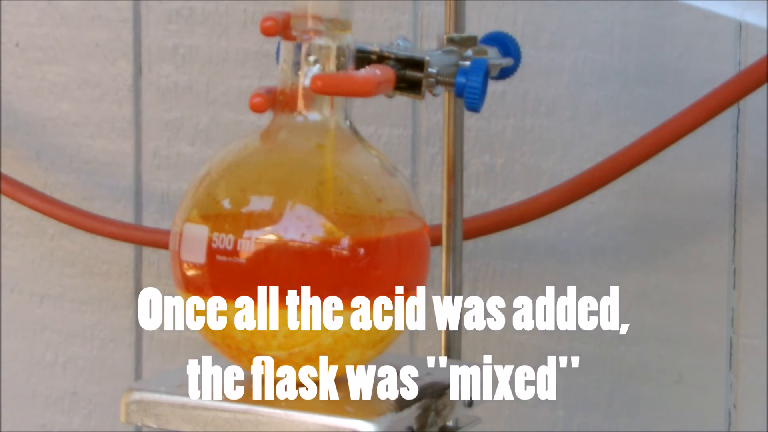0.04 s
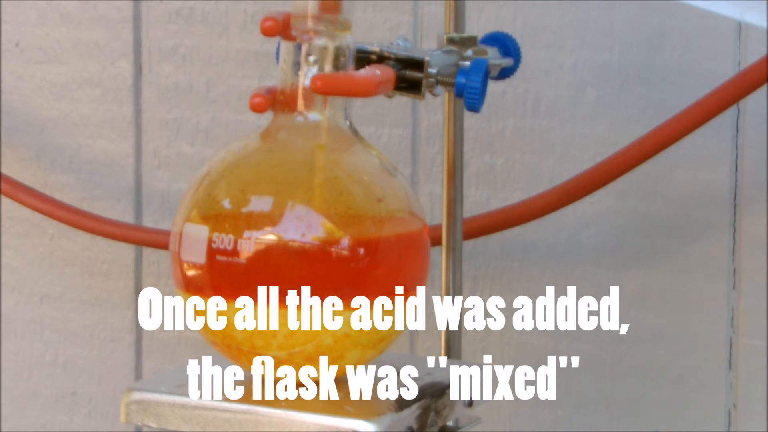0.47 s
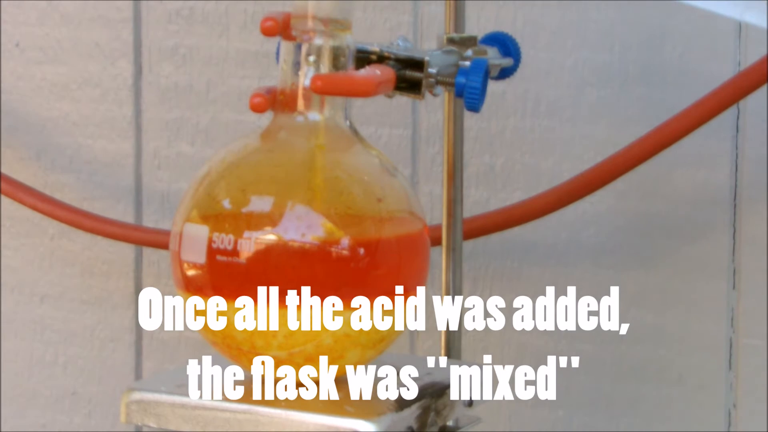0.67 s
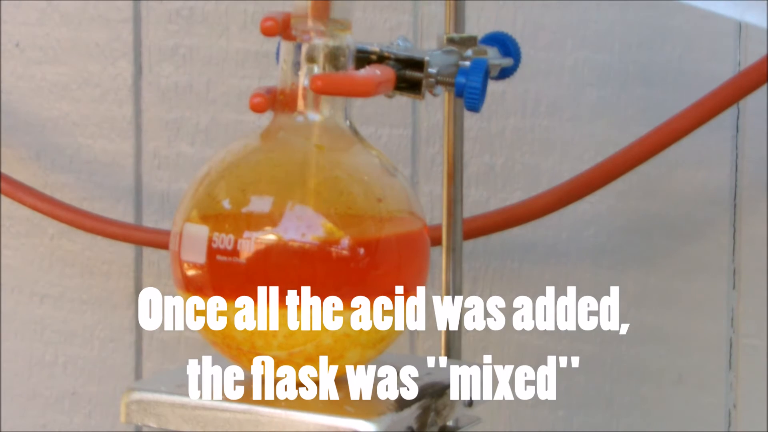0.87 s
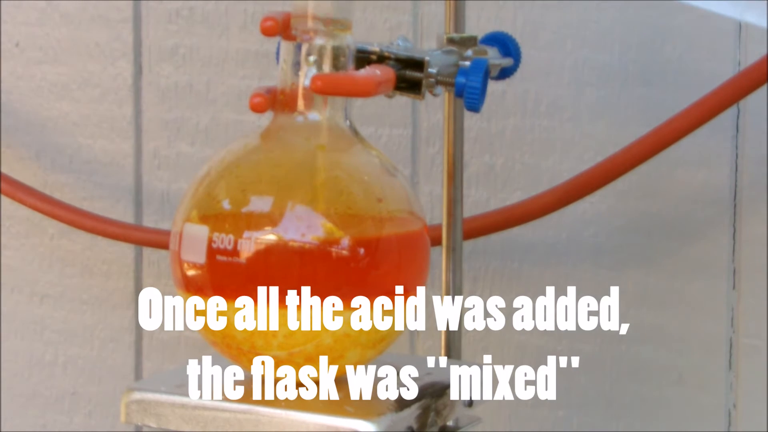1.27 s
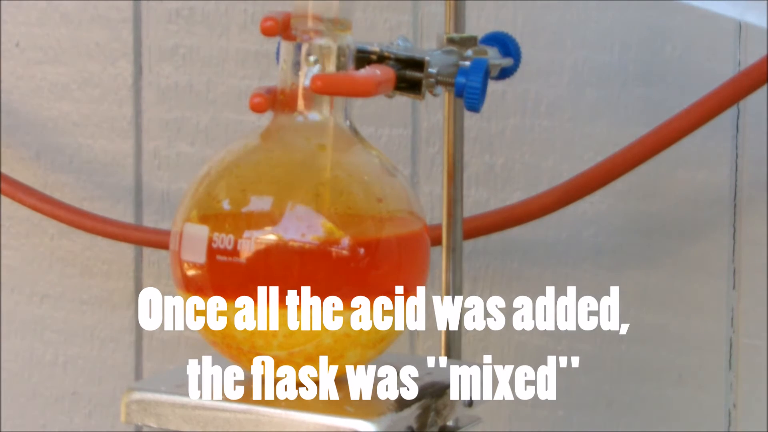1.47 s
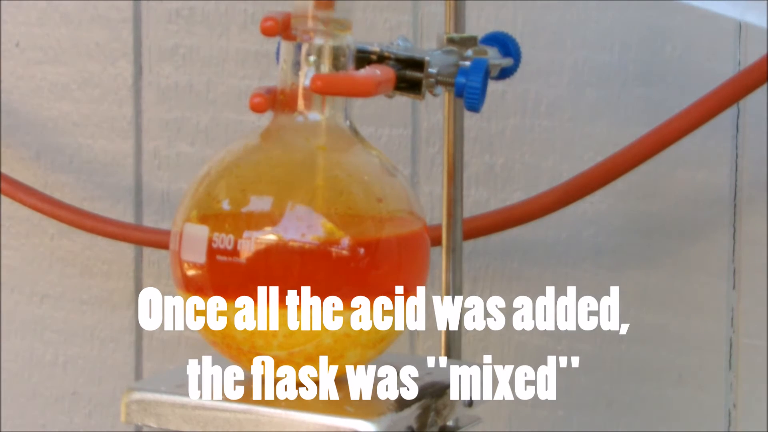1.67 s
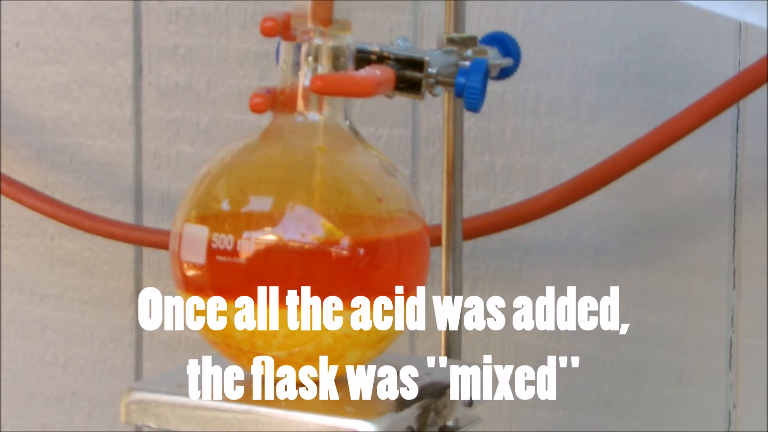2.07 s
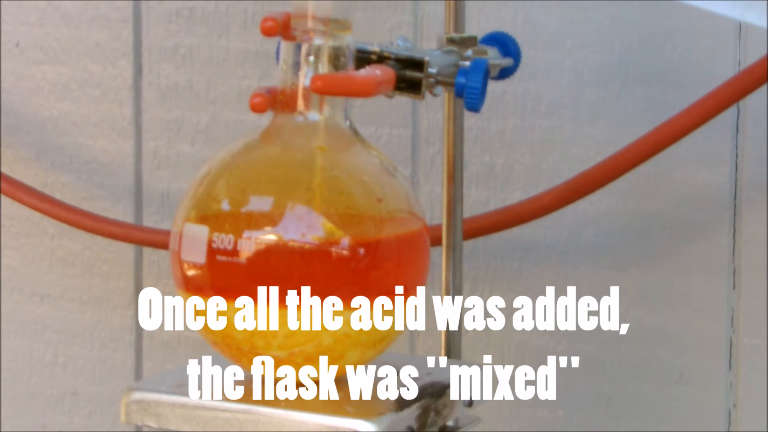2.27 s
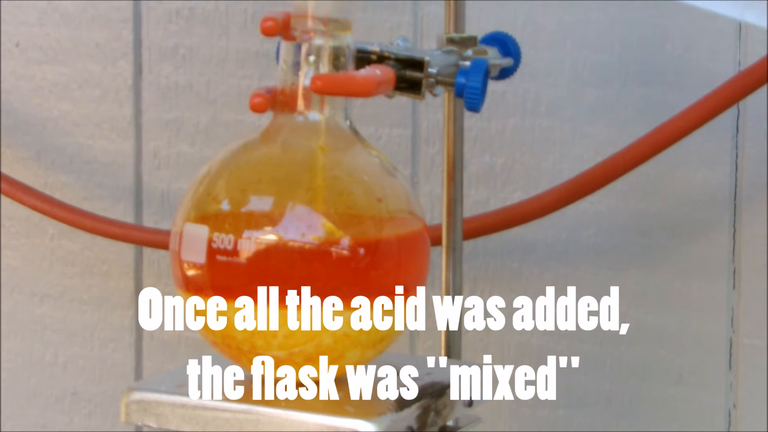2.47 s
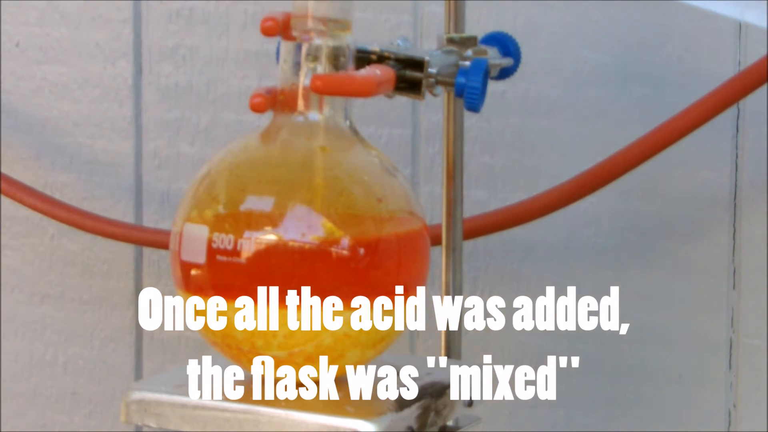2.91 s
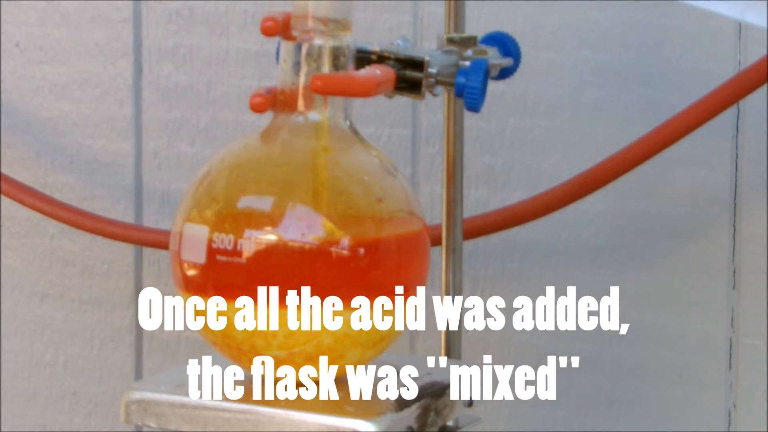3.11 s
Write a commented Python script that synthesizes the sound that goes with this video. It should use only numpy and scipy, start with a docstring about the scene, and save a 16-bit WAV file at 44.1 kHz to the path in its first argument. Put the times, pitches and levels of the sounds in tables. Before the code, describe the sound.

A glass flask rattling in a metal clamp, with sharp, uneven clinks and knocks.

```python
"""Glass chinks and clatters against metal, about four times a second: a round flask full of liquid
is being rocked in its clamp on a lab stand. On each swing the glass chinks and knocks against the
clamp, the stand shudders, and the loose clamp taps back on the rod. Each of these hits is a broad
crack plus ringing modes. The grip squeaks once at the start, and the clatter rings briefly in a
small room over a low hiss."""
import sys
import numpy as np
from scipy import signal
from scipy.fft import rfft, irfft
from scipy.io import wavfile
from scipy.ndimage import uniform_filter1d

SR = 44100
rng = np.random.default_rng(int(sys.argv[2]) if len(sys.argv) > 2 else 0)


def unload_wav(signal):
    """Save mono or channel-first audio to the path in sys.argv[1] as 16-bit WAV at rate SR, clipped to [-1, 1]."""
    wavfile.write(
        sys.argv[1],
        SR,
        np.round(np.clip(np.atleast_2d(signal).T, -1, 1) * 32767).astype(np.int16),
    )


N = 143325
SPAN = 16384  # samples given to one hit or to the room's tail

# Hit cues, levels relative within each layer: start_s, level_db, bass_db, middle_db, ring_db
FLASK_KNOCKS = [(0.2268,-40,6,3,3), (0.5292,-31.5,-2.5,-3,2.5), (0.833,-33,-6,-3,-1),
                (1.1103,-38.5,1.5,-1.5,-3), (1.3611,-42.5,4.5,2,-4), (1.6228,-43.5,5.5,4,-4),
                (1.8606,-38.5,1.5,-7.5,1.5), (2.0996,-45,8.5,2,-3.5), (2.3532,-32,-1.5,2,-9),
                (2.609,-31,-3,5.5,-5.5)]
CLAMP_TAPS = [(0.32,-51.5,0.5,-5,3), (0.5992,-31,-2.5,-9,-4.5), (0.668,-49.5,0,3.5,-6),
              (0.9185,-41,3,-4,-8), (0.9505,-50.5,-6,-3,-0.5), (1.1938,-32.5,-3,-9.5,-4.5),
              (1.2873,-47.5,-0.5,0.5,-16), (1.7115,-41.5,0.5,-3.5,-5.5), (1.9875,-42.5,1,-1.5,-8),
              (2.2085,-45,-4,-2.5,-1.5), (2.6832,-34,-4,-5.5,-4), (2.7475,-44.5,-4,-3.5,-5.5),
              (2.9415,-33.5,-1,-5.5,-6), (2.985,-42.5,-2.5,1.5,-12)]
GLASS_CHINKS = [(0.106,-52.5,-3,5,3), (0.1385,-58,-2,8,5), (0.2165,-36,-3,2,1.5), (0.305,-41,-5,1.5,6.5),
                (0.4855,-40,-6,-6.5,5.5), (0.845,-29.5,-1.5,-1,-2.5), (0.903,-53,2,5,2),
                (1.0535,-47,-3.5,-2,1.5), (1.3728,-32.5,-6.5,-3,7), (1.491,-53.5,-1.5,4.5,-11),
                (1.5453,-45.5,-25,-10.5,-8), (1.5865,-51.5,2,-4,4), (1.844,-42,-3,1.5,1),
                (2.0695,-46.5,-1,3.5,5), (2.3018,-54.5,-18,-38,0), (2.338,-38.5,-6.5,0,0.5),
                (2.431,-40,-1,-6,-3), (2.438,-31.5,-6,-2,-3.5), (2.6185,-40,4.5,-11,7.5)]
# Dull bumps of the stand: start_s, level_db
STAND_BUMPS = [(0.521,-58), (0.538,-51.5), (1.371,-42), (2.362,-39), (2.6202,-40), (2.886,-48.5)]
# The ring of each kind of hit, and the stand's low shudder: pitch_hz, energy_db, t60_s
KNOCK_RING = [(713, -28, 0.066), (932, -19, 0.051), (1140, -39, 0.17), (1376, -12.5, 0.14),
              (2134, -16.5, 0.034), (2450, -28, 0.02), (4080, -22.5, 0.1), (4592, -10, 0.024),
              (4780, -21, 0.015), (4830, -6.5, 0.023), (5076, -5, 0.017), (5180, -11, 0.0083)]
TAP_RING = [(890, -16, 0.036), (1370, -28, 0.029), (1478, -8, 0.04), (2140, -10.5, 0.02), (2234, -15, 0.24),
            (2664, -17, 0.064), (3454, -14, 0.026), (6970, -5.5, 0.017), (7334, -33, 0.059),
            (8600, -14.5, 0.033), (12540, -12, .03), (14150, -7.5, 0.013)]
CHINK_RING = [(2600, -22, .03), (9190, -11, .03), (9640, -10.5, .016), (9730, -9, .022), (10100, -17, .015),
              (10720, -19, .015), (11900, -18, .015), (12400, -20, .012)]
STAND_RING = [(123.7, -14, 0.66), (129, -1.5, 0.086), (288, -2, 0.1), (355, -1.5, 0.16)]
# Tone of the crack on each kind of hit: frequency_hz, gain_db
KNOCK_EQ = [(30, -37), (100, -34), (300, -18), (600, -7.5), (950, 0.5), (2500, 0), (3500, -5.5),
            (4900, 4.5), (6300, -4.5), (12500, -0.5), (15500, -4.5)]
TAP_EQ = [(100, -39), (550, -21.5), (900, -3), (1600, -5), (3200, -9), (6000, -3), (7000, -0.5),
          (10700, -5.5), (13000, 0.5), (15500, -2)]
CHINK_EQ = [(100, -20.5), (500, -24), (850, -0.5), (2200, -1), (3400, -8.5), (5200, -5.5), (8000, -4),
            (9700, -5), (12500, -0.5), (15500, -5)]
BUMP_EQ = [(30, -24), (100, -12), (450, -9.5), (750, 11), (1050, 18), (1700, 9.5), (2400, 6), (4000, -8.5),
           (15000, -11)]
# Path of the grip's squeak: time_s, pitch_hz, level_db
SQUEAK_PATH = [(0.0, 1800, -69), (0.028, 1763, -66), (0.044, 1815, -68), (0.061, 1870, -75),
               (0.066, 1945, -57.5), (0.082, 1956, -60), (0.090, 1765, -61), (0.108, 1807, -65),
               (0.125, 1780, -81)]
# The note the slipping grip draws from the glass: pitch_hz, peak_db, length_s
GLASS_NOTE = (4870, -67, .07)
# First echoes off the bench and walls: delay_s, gain_db
REFLECTIONS = [(.0025, -19), (.0095, -25), (0.0171, -19)]
# Decay of the reverb: frequency_hz, t60_s
REVERB_DECAY = [(100, 0.52), (1000, 0.23), (5000, 0.27), (15000, 0.18)]
# Tone of the reverb and of the hiss: frequency_hz, gain_db
REVERB_EQ = [(100, -3.5), (400, 8), (900, 2.5), (2000, -0.5), (5000, -2), (9000, -2.5), (15000, -2.5)]
HISS_EQ = [(25, -21), (100, -19.5), (250, -11.5), (770, -1.5), (1180, -4.5), (1580, -5), (2200, -11.5),
           (3500, -13), (5300, -17), (11500, -14.5), (15000, -12)]
# How alike left and right are, 1 being mono: frequency_hz, likeness
REVERB_IMAGE = [(100, 1), (1600, 0.97), (2800, 0.97), (5000, 0.51), (15000, 0.063)]
HISS_IMAGE = [(60, 0.8), (950, .9), (3800, 0.49), (15000, 0.15)]

BASS_HZ, MIDDLE_HZ, TREBLE_HZ = 2240, 4730, 8600  # anchors of each hit's tone tilt
ATTACK_S, CHATTER_HOLD_S, CHATTER_GRIT_DB = 0.0011, 0.00053, 5
MODE_SPREAD_DB, RIPPLE_DB = 2.5, 3.5  # hit-to-hit variation of ring and crack
CRACK_WIDTH, MONO_BELOW_HZ = 0.6, 7600  # the crack's side gain, and where its image narrows
TICKS_PER_S, TICK_DB, TICK_SPREAD_DB = 13, -69, 3
STAND_DB, HISS_DB = -45, -64
SQUEAK_WOBBLE = 0.012  # rms share of the pitch
PREDELAY_S, REVERB_BUILD_S = 0.0015, 0.0055


def flask_knocks(room):
    """The flask knocks home in the clamp on each swing."""
    return contacts(FLASK_KNOCKS, KNOCK_EQ, KNOCK_RING, room,
                    crack_t60=0.024, gain_db=24, pan_db=-0.8, wet_db=0.5, ring_wet_db=-4)


def clamp_taps(room):
    """The loose clamp taps back on the metal rod."""
    return contacts(CLAMP_TAPS, TAP_EQ, TAP_RING, room,
                    crack_t60=0.015, gain_db=25.5, pan_db=-0.5, wet_db=-0.64, ring_wet_db=-3)


def glass_chinks(room):
    """Light touches set off the glass's short, bright modes."""
    return contacts(GLASS_CHINKS, CHINK_EQ, CHINK_RING, room,
                    crack_t60=0.018, gain_db=24, pan_db=-1, wet_db=-0.5, ring_wet_db=-3.5)


def contacts(cues, crack_eq, modes, room, crack_t60, gain_db, pan_db, wet_db, ring_wet_db=0):
    """Each hit is a crack plus any ringing modes, tilted by how it lands and sent to the room."""
    buses = np.zeros((3, N + SPAN))
    side_highpass = signal.butter(2, MONO_BELOW_HZ, "high", fs=SR)
    for start_s, level_db, bass_db, middle_db, ring_db in cues:
        bursts = np.array([chatter(crack_t60), chatter(crack_t60)])
        crack, crack_side = colour(bursts, per_hz(crack_eq, SPAN) + ripple())
        ring = from_db(ring_db) * ringing(modes)
        side = CRACK_WIDTH * signal.lfilter(*side_highpass, crack_side)
        send = crack + from_db(ring_wet_db) * ring
        hit = np.array([crack + ring, side, send])
        tilt_db = per_hz([(BASS_HZ, bass_db), (MIDDLE_HZ, middle_db), (TREBLE_HZ, 0)], SPAN)
        start = int(start_s * SR)
        buses[:, start:start + SPAN] += colour(hit, level_db + gain_db + tilt_db)
    mid, side, send = buses[:, :N]
    pan = from_db([[pan_db / 2], [-pan_db / 2]])
    return np.array([mid + side, mid - side]) * pan + reverb(send, room, wet_db)


def chatter(t60):
    """Surfaces meet in a brief flurry of uneven micro-impacts: even spectrum, unit energy."""
    t = np.arange(SPAN // 8) / SR
    envelope = np.minimum(t / ATTACK_S, 1) * from_db(-60 * np.maximum(t - CHATTER_HOLD_S, 0) / t60)
    grit = rng.standard_normal(len(t)) * from_db(CHATTER_GRIT_DB * rng.standard_normal(len(t)))
    spectrum = rfft(grit * envelope)
    contour = np.sqrt(uniform_filter1d(abs(spectrum) ** 2, size=24))
    burst = irfft(spectrum / contour) * (envelope > from_db(-60))
    return np.pad(burst / np.linalg.norm(burst), (0, SPAN - len(t)))


def ripple():
    """The point of contact gives a crack its own peaks and dips, in dB, shallower in the bass."""
    heights_db = RIPPLE_DB * rng.standard_normal(56)
    hz = np.linspace(1, SR / 2, len(heights_db))  # about 400 Hz apart
    return per_hz(np.transpose([hz, heights_db * np.minimum(hz / BASS_HZ, 1)]), SPAN)


def ringing(modes):
    """Struck modes die away as sines; every hit excites them a little differently."""
    out = np.zeros(SPAN)
    for hz, energy_db, t60 in modes:
        t = np.arange(min(int(t60 * SR) + 2, SPAN)) / SR
        envelope = np.minimum(t / ATTACK_S, 1) * from_db(-60 * t / t60)
        mode = np.sin(2 * np.pi * (hz * t + rng.random())) * envelope
        strength = from_db(energy_db + MODE_SPREAD_DB * rng.standard_normal())
        out[:len(t)] += strength * mode / np.linalg.norm(mode)
    return out


def stand_bumps(room):
    """The stand bumps dully: a dark crack with no ring."""
    cues = [(start_s, level_db, 0, 0, 0) for start_s, level_db in STAND_BUMPS]
    return contacts(cues, BUMP_EQ, [], room, crack_t60=0.016, gain_db=21, pan_db=0, wet_db=-2)


def stand_shudder():
    """Low-end weight: every knock, and the last bump, shakes the heavy stand about equally hard."""
    out = np.zeros(N + SPAN)
    for start_s, *_ in FLASK_KNOCKS + STAND_BUMPS[-1:]:
        start = int(start_s * SR)
        out[start:start + SPAN] += from_db(STAND_DB) * ringing(STAND_RING)
    return out[:N]


def grip_squeak():
    """The clamp's grip slips on the glass: one thin, wavering tone."""
    time_s, pitch_hz, level_db = np.transpose(SQUEAK_PATH)
    t = np.arange(N) / SR
    wobble = uniform_filter1d(rng.standard_normal(N), size=100)
    pitch = np.interp(t, time_s, pitch_hz) * (1 + SQUEAK_WOBBLE * wobble / wobble.std())
    envelope = from_db(np.interp(t, time_s, level_db)) * (t < time_s[-1])
    return np.sqrt(2) * np.sin(2 * np.pi * np.cumsum(pitch) / SR) * envelope


def singing_glass():
    """A faint high note swells and fades as the grip begins to slip."""
    pitch_hz, peak_db, length_s = GLASS_NOTE
    t = np.arange(N) / SR
    swell = np.sin(np.pi * np.sqrt(np.minimum(t / length_s, 1)))
    return from_db(peak_db) * np.sin(2 * np.pi * pitch_hz * t) * swell


def fitting_ticks(room):
    """The fittings tick faintly at random moments."""
    slots = 60
    starts_s = rng.uniform(0, N / SR, slots)
    levels_db = rng.normal(TICK_DB, TICK_SPREAD_DB, slots)
    fires = rng.random(slots) < TICKS_PER_S * N / SR / slots
    cues = [(s, db, 0, 0, 0) for s, db in zip(starts_s[fires], levels_db[fires])]
    return contacts(cues, CHINK_EQ, [], room, crack_t60=0.014, gain_db=32.5, pan_db=-3, wet_db=-15)


def small_room():
    """The room's response: a few early echoes and a dense tail that dies sooner in the treble."""
    t = np.arange(SPAN) / SR
    frame = 256
    _, frame_s, cells = signal.stft(stereo_noise(REVERB_EQ, REVERB_IMAGE, SPAN), SR, nperseg=frame)
    t60 = per_hz(REVERB_DECAY, frame)[:, None]
    equal_energy = np.sqrt(2 * np.log(1000) / (t60 * SR))  # longer decays start quieter
    _, tail = signal.istft(cells * from_db(-60 * frame_s / t60) * equal_energy, SR)
    response = tail[:, :SPAN] * np.clip((t - PREDELAY_S) / REVERB_BUILD_S, 0, 1)
    for delay_s, gain_db in REFLECTIONS:
        response[:, int(delay_s * SR)] += from_db(gain_db)
    return response


def reverb(send, room, wet_db):
    """The room's stereo return for a mono send."""
    return from_db(wet_db) * signal.fftconvolve(send[None], room, axes=1)[:, :N]


def room_hiss():
    """A quiet, steady bed of room noise."""
    noise = stereo_noise(HISS_EQ, HISS_IMAGE, N)
    return from_db(HISS_DB) * noise / noise.std()


def stereo_noise(eq, image, size):
    """Coloured noise, narrow in the bass and wide at the top."""
    mid, side = rfft(rng.standard_normal((2, size)))
    likeness = np.clip(per_hz(image, size), 0, 0.995)
    left_right = np.sqrt((1 + likeness) / 2) * mid + np.sqrt((1 - likeness) / 2) * side * [[1], [-1]]
    return irfft(left_right * from_db(per_hz(eq, size)), size)


def colour(x, gain_db):
    """Minimum-phase EQ with a gain for each bin, so nothing rings ahead of the attack."""
    cepstrum = irfft(gain_db * np.log(10) / 20)
    cepstrum[1:SPAN // 2] *= 2
    cepstrum[SPAN // 2 + 1:] = 0
    return irfft(rfft(x, SPAN) * np.exp(rfft(cepstrum)))


def per_hz(points, size):
    """Draw a curve through (frequency_hz, value) points across the bins of a spectrum."""
    hz, value = np.transpose(points)
    return np.interp(np.log(np.fft.rfftfreq(size, 1 / SR) + 1), np.log(hz), value)


def from_db(db):
    """Decibels to gain."""
    return 10 ** (np.asarray(db) / 20)


def scene():
    """The clatter and the centred shudder, squeak and glass note share one room, over the hiss."""
    room, hiss = small_room(), room_hiss()
    clatter = flask_knocks(room) + clamp_taps(room) + glass_chinks(room) + stand_bumps(room)
    tones = stand_shudder() + grip_squeak() + singing_glass()
    return clatter + tones + reverb(tones, room, wet_db=-1.5) + fitting_ticks(room) + hiss


def record(dry):
    """A steep low-pass takes off the very top."""
    stopband_hz = 15800
    return signal.sosfilt(signal.cheby2(14, 50, stopband_hz, fs=SR, output="sos"), dry)


dry = scene()
out = record(dry)
unload_wav(out)
```